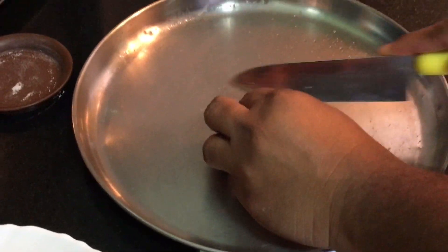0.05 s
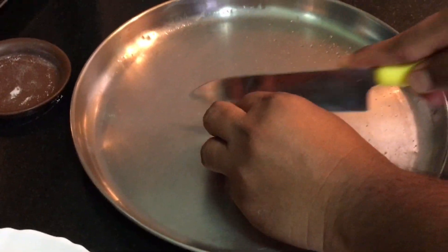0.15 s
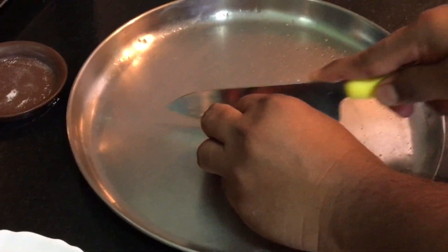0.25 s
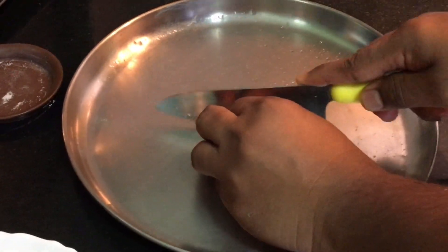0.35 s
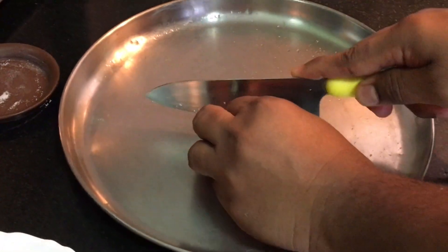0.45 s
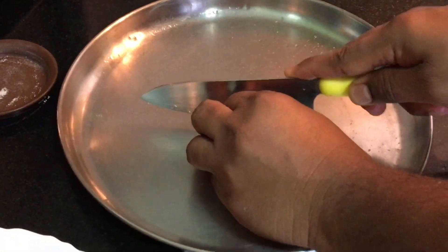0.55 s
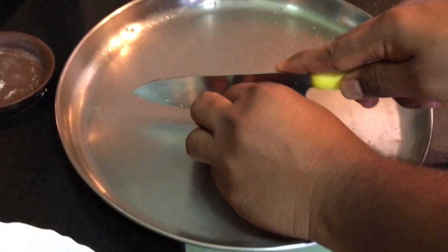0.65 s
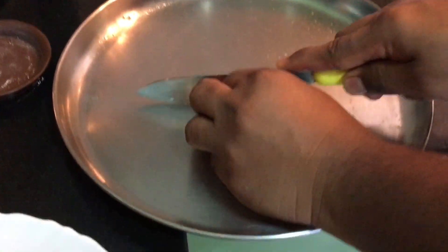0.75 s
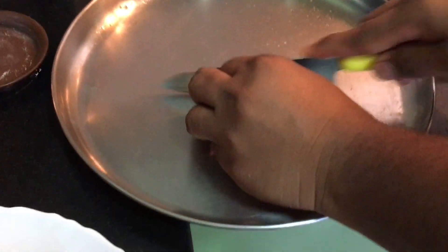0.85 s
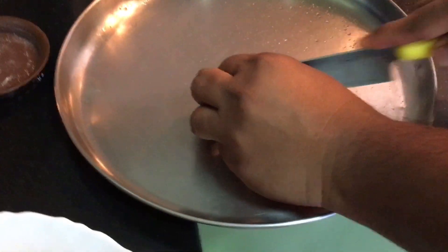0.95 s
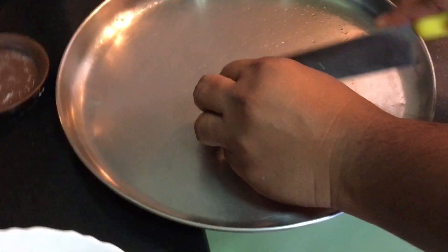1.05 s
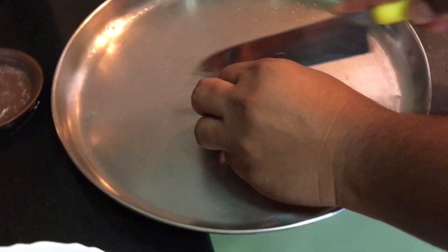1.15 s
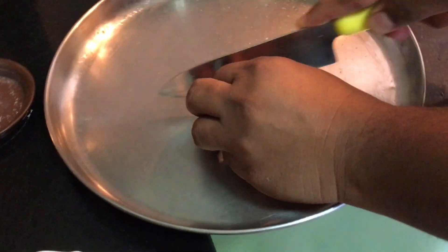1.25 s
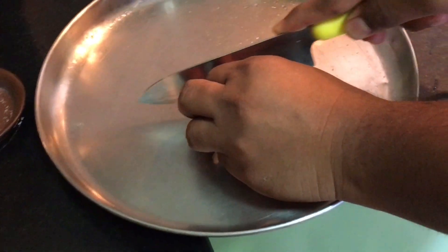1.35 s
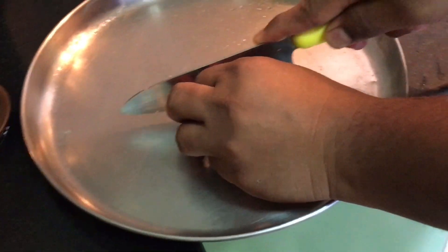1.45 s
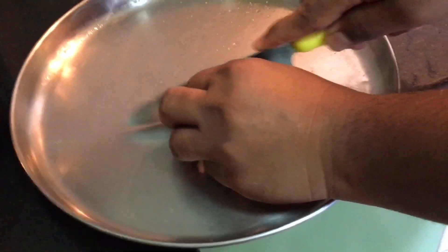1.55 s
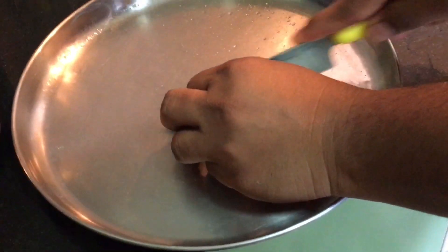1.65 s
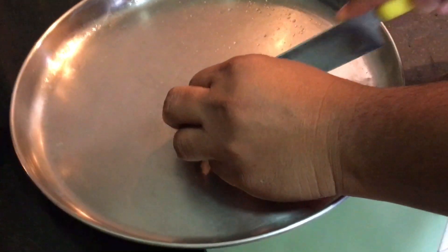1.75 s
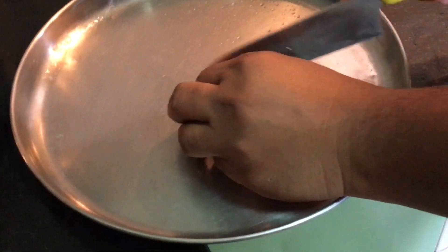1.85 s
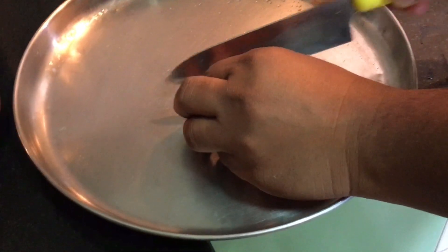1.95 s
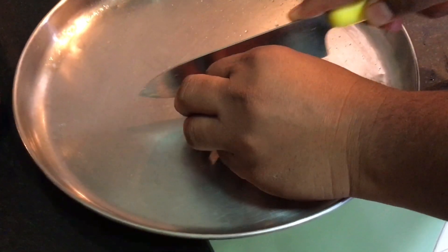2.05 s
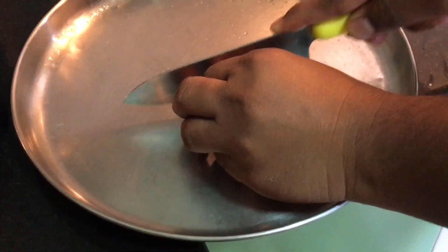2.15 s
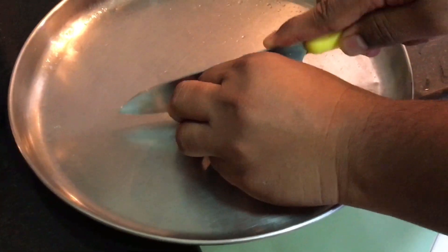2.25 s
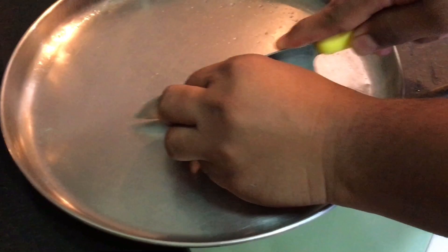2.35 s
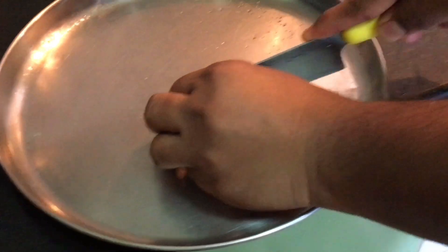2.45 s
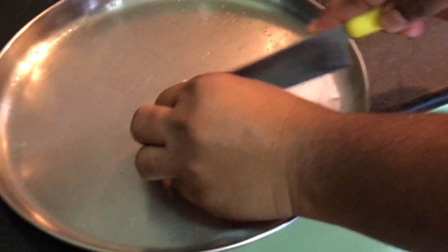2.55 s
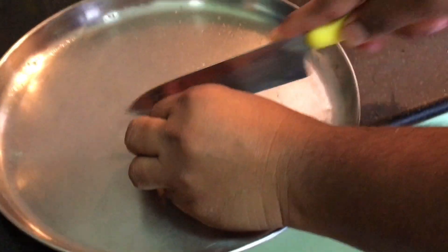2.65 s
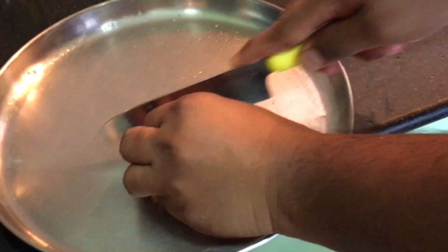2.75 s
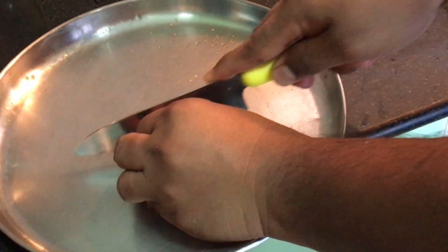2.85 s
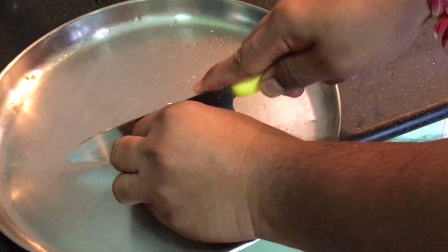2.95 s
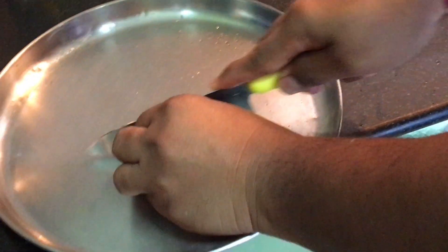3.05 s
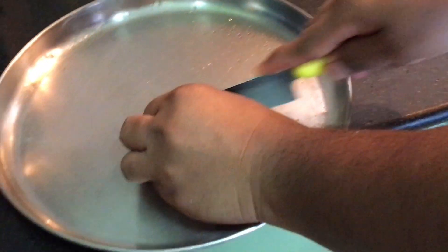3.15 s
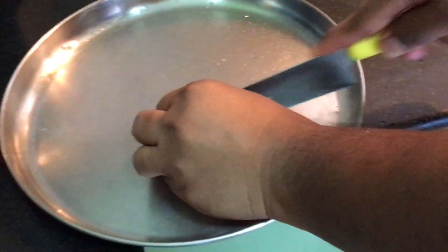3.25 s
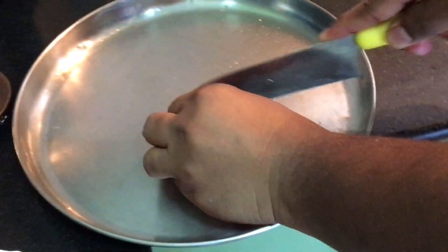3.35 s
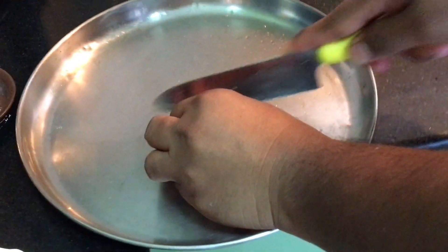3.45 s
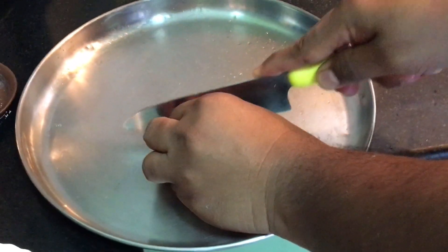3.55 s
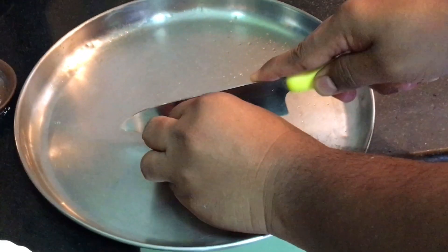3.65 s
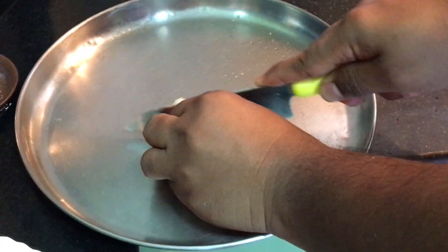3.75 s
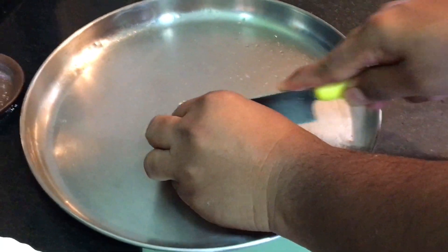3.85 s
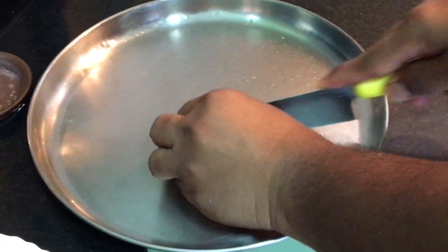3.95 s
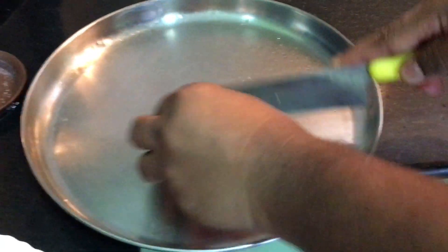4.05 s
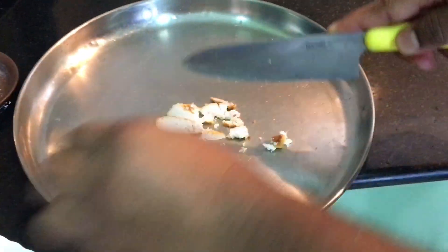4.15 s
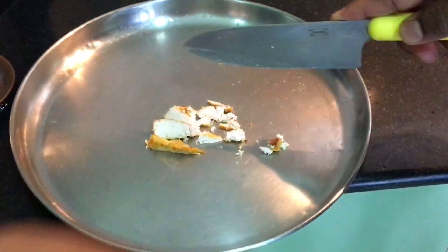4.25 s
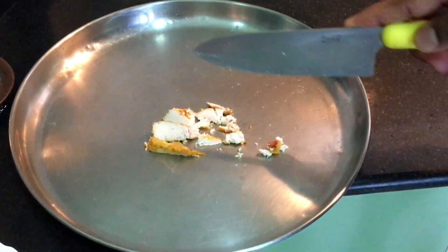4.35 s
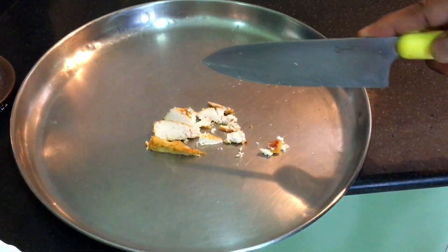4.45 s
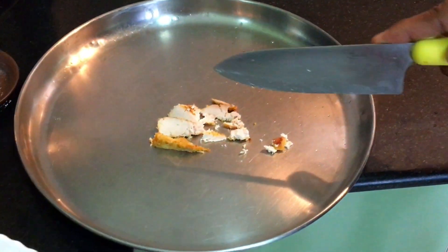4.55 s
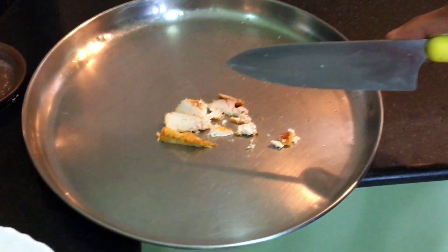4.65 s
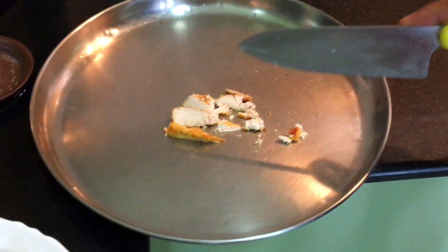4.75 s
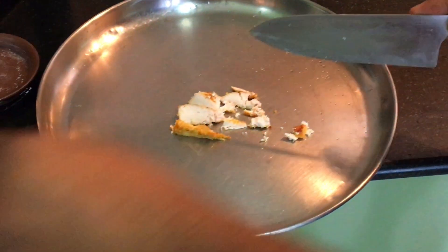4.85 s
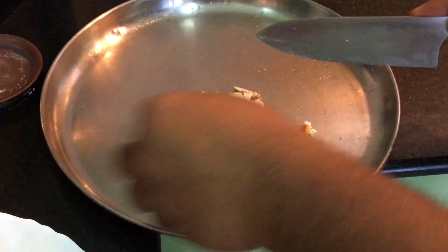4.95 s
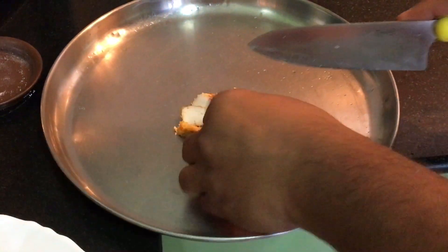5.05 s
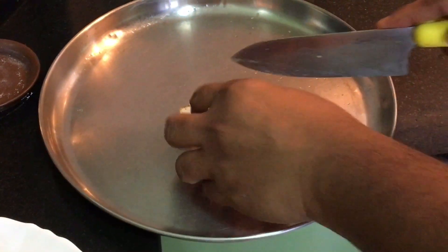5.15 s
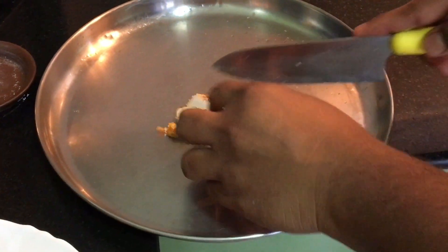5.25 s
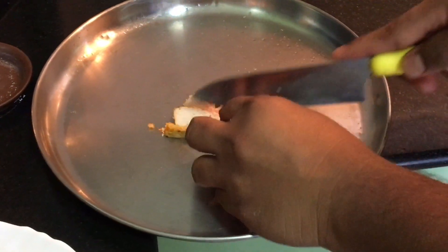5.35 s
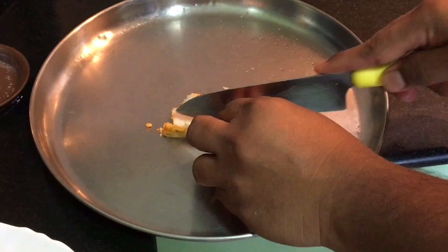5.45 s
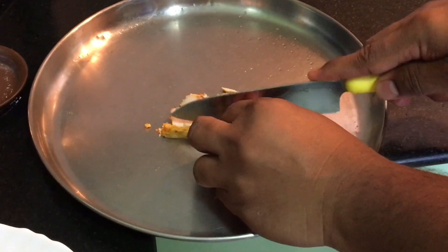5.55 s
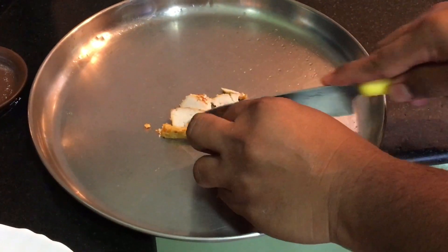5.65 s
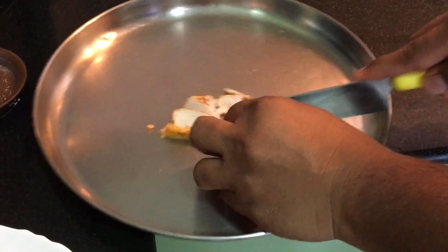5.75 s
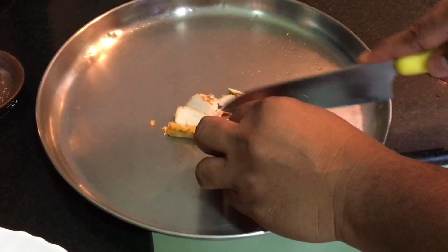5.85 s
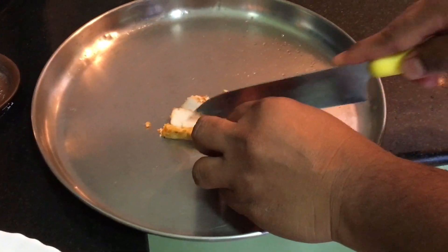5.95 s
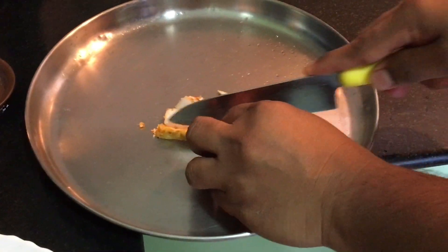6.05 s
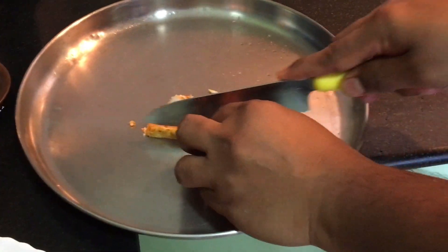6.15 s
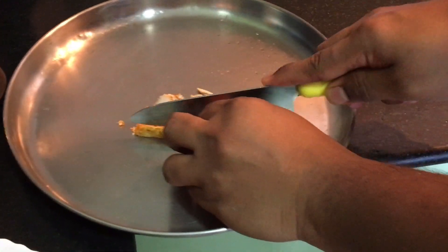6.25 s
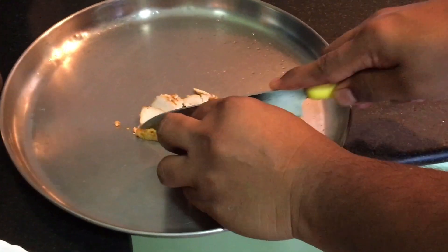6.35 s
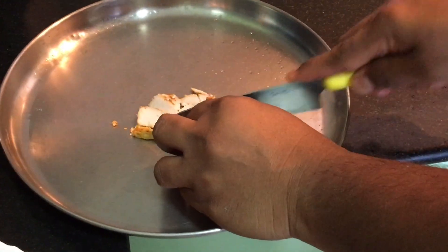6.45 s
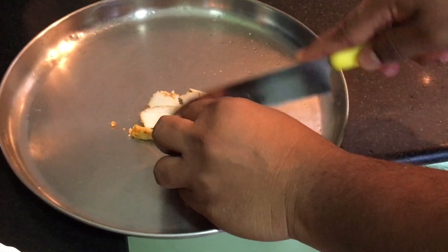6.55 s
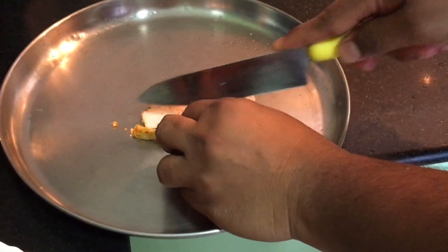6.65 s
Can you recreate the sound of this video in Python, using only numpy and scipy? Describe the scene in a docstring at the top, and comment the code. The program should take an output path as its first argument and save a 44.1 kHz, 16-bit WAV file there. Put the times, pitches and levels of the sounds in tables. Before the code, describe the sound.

A kitchen knife chops cooked chicken on a round steel plate, close to the microphone. About nine sharp knocks come unevenly, each with a short, half-damped metallic ring and a brief room echo. Between them the edge drags over the steel with a gritty hiss, blade and fingers tap lightly, and low thuds pass through the counter. Faint hum and hiss fill the quiet kitchen.

```python
"""A quiet tiled kitchen: a knife chops cooked chicken on a round steel plate, close to a phone.
Each chop knocks the plate, half damped by the hand, and the room answers; the edge then drags
back over the steel with a gritty hiss. Blade, fingers and crumbs tap lightly in between.
The pressed plate mutters, bumps cross the counter as low thuds, and the air hums and hisses."""
import sys
import numpy as np
from scipy import signal
from scipy.fft import rfft, irfft, next_fast_len
from scipy.io import wavfile
from scipy.ndimage import uniform_filter1d, map_coordinates

SR = 44100
rng = np.random.default_rng(int(sys.argv[2]) if len(sys.argv) > 2 else 0)


def unload_audio(sound):
    """Save the sound as a 16-bit wav file, at the path given as the first command line argument."""
    columns = np.transpose(np.atleast_2d(sound))
    # keep every value between -1 and 1, then stretch to whole-number steps
    steps = np.round(np.clip(columns, -1, 1) * 32767)
    wavfile.write(sys.argv[1], SR, steps.astype(np.int16))


N = 296352

# air noise: f/Hz, density/dB
AIR_SPECTRUM = [(25, -11.5), (55, 4.5), (90, -6.5), (137, -7), (180, -18), (320, -14), (520, -15.5),
                (1180, -20), (2500, -24), (5000, -28), (10000, -31), (17000, -28)]
# background drift: t/s, hiss change/dB, whistle level/dB
AIR_DRIFT = [(0, 2, -92), (1.1, 1, -76), (1.45, -0.5, -71), (2.2, 3, -89), (2.8, -2, -81), (3.05, 2.5, -80),
             (3.55, -2, -79), (3.9, 6, -78), (4.5, -2, -70), (5, 3, -69), (5.35, -2.5, -72.5),
             (5.9, 4, -66), (6.72, 2, -93)]
# room decay: f/Hz, t60/s
ROOM_DECAY = [(150, 0.9), (700, 0.41), (3000, 0.41), (12000, 0.22)]
# plate modes: f/Hz, level/dB, t60/s at damping 1
PLATE_MODES = [(153.4, -8.5, 0.23), (229.7, -0.5, 0.27), (312.6, -2.5, 0.17), (454.4, -11.5, 0.12),
               (571, -16.5, 0.39), (654, -13.5, 0.37), (685, -16, 0.26), (795, -22, 0.38), (1074, -40, 1),
               (1174, -8.5, 0.22), (1368, -20, 0.73), (1466, -36, 0.38), (1640, -20, 0.46),
               (1925, -14.5, 0.27), (2286, -16.5, 0.38), (2355, -11, 0.057), (2480, -10.5, 0.31),
               (2615, -16, 0.33), (2620, -16, 0.1), (3020, -12.5, 0.25), (3256, -20, 0.33),
               (3410, -11.5, 0.24), (3810, -7.5, 0.11), (4080, -23.5, 0.26), (4950, -26, 0.23),
               (5800, -13.5, 0.13), (6900, -27.5, 0.077), (8550, -23, 0.17)]
# hand and blade press the plate: t/s of most force, level/dB, rise/s per 20 dB
PLATE_PRESSES = [(.92, -43, 0.085), (1.74, -53, 0.14), (2.47, -34, 0.045), (2.87, -54.5, 0.035),
                 (3.24, -71, .1), (3.95, -53, .1), (5.08, -65, 0.02), (5.63, -34.5, 0.046),
                 (5.758, -26, 0.014), (6.28, -41.5, .03), (6.38, -51, .06), (6.72, -42, 0.052)]
# bumps through the counter: t/s, level/dB, f/Hz
COUNTER_THUDS = [(0.285, -45, 74), (0.744, -47, 63.5), (1.092, -42.5, 79), (1.155, -54, 88),
                 (1.28, -48.5, 133), (1.72, -41, 103.3), (1.768, -37, 40.4), (2.032, -31.5, 59.5),
                 (2.058, -22, 60.3), (2.149, -38, 70.6), (2.306, -50, 67), (2.451, -25.5, 74),
                 (2.475, -20, 56.6), (2.53, -32, 88.4), (2.884, -36, 77.4), (2.951, -38.5, 66.5),
                 (3.789, -36, 134), (4.04, -48, 79), (4.852, -31.5, 67), (5.055, -40, 72.7),
                 (5.59, -35.5, 139), (5.739, -38, 90), (6.277, -28.5, 56.5), (6.293, -33.5, 89.4),
                 (6.68, -25, 58.6)]
# sliding friction: f/Hz, density/dB
SLIDE_SPECTRUM = [(400, -11), (800, -13), (1500, -7.5), (3000, -8.5), (5500, -7), (9000, -12.5),
                  (13000, -13.5), (17000, -4.5)]
# blade resonances: f/Hz, width/Hz (140 at least is used), level/dB
BLADE_MODES = [(2190, 270, 2.5), (3120, 50, -28), (4060, 120, -5.5), (6150, 105, -2), (6940, 150, -24),
               (8950, 560, -7)]
# edge or finger slides: start/s, stop/s, level/dB, change/dB, blade song/dB, song centre/Hz
SLIDE_STROKES = [(0.813, 1.03, -42, 0.5, -22.5, 3850), (1.614, 1.778, -43, 4.5, -18.5, 5860),
                 (1.78, 2.243, -65, -14.5, -0.5, 2300), (2.36, 2.523, -41, 4, -19, 5450),
                 (2.85, 2.917, -55, -3, -18, 4030), (3.1, 3.29, -41.5, 5, -20.5, 4000),
                 (3.875, 4.024, -45.5, 5, -14, 4000), (4.051, 4.388, -58, -6.5, -2, 3530),
                 (4.588, 4.77, -54.5, 5, -33, 3160), (4.771, 4.877, -41.5, 4, -23, 2980),
                 (4.896, 5.098, -60, -25, -21, 6860), (5.439, 5.496, -45.5, 4, -7, 2620),
                 (5.51, 5.596, -51.5, 28, -25, 2600), (5.842, 6.26, -57.5, 6, -5, 4200),
                 (6.245, 6.33, -51.5, -4.5, -12.5, 2500), (6.41, 6.537, -45.5, 13.5, -15.5, 5500),
                 (6.573, 6.725, -55.5, 26, -20, 2300)]
# tap decay: centre f/Hz, t60/s
TAP_DECAY = [(350, 0.03), (3000, 0.073), (8000, 0.064)]
# light touches: t/s, level/dB, centre f/Hz, width/octaves, ring/dB
LIGHT_TAPS = [(1.194, -38.5, 3720, 1.1, -15), (1.248, -41.5, 2150, 0.73, -22),
              (1.283, -42, 4370, 0.33, -25), (1.516, -38, 2720, .9, -22), (1.75, -30.5, 3100, 0.31, -36),
              (2.025, -34, 2400, 3.3, -7), (2.45, -12.5, 685, 1.77, -11), (3.226, -27, 8000, 1.9, -29),
              (3.286, -25, 5860, 2.6, -22.5), (3.992, -23, 2320, 1.3, -15), (4.598, -40, 5000, 1.9, -31),
              (4.808, -22, 2200, 4, -12), (5.064, -27, 564, 0.86, -6.5), (5.111, -39, 3880, 0.23, -26),
              (5.343, -30, 346, 1, -11.5), (5.385, -33.5, 1770, 1.4, -31), (5.571, -42, 3850, .8, 3.5),
              (6.088, -29.5, 8000, 0.93, -24), (6.253, -35.5, 2500, 0.92, 7), (6.521, -24, 2180, 1.1, -31),
              (6.663, -31.5, 890, 2.5, -4.5)]
# crash of a chop: f/Hz, density/dB
CRASH_SPECTRUM = [(88, -11), (200, -10.5), (700, -5.5), (1500, -1.5), (3000, -6.5), (5500, -3.5),
                  (9000, -8.5), (13000, -9.5), (17000, -7)]
# crash decay: f/Hz, t60/s at damping 1
CRASH_DECAY = [(200, 0.11), (1000, 0.082), (3000, 0.065), (8000, 0.054), (16000, 0.013)]
# blows: t/s, level/dB, ring/dB, bass ring/dB, tilt/(dB/octave), f/Hz the spot favours, its lift/dB
KNIFE_CHOPS = [(.743, -3.5, -21.5, 2, -1, 1450, 26), (1.571, -9, -20.5, 1, -1.5, 1440, 17),
               (2.302, -6.5, -23.5, 2.5, -0.8, 2410, 6), (3.055, -9.5, -22, 5, -0.9, 2680, 11.5),
               (3.7805, 0.5, -27.5, 9, -1.2, 1170, 1), (4.8435, -18.5, -23, -2, -1.5, 2330, 10),
               (5.594, 0, -21, -8, -1.5, 1195, 6), (5.742, -2, -22.5, 0, 2.5, 2433, 8.5),
               (6.329, -6, -24.5, -6, -1.5, 1930, 14)]
# treble ripple, then a steep cutoff near 15.8 kHz: f/Hz, gain/dB
TREBLE_RESPONSE = [(3500, -1), (4200, -1), (5000, -3), (6600, 1), (7800, -1.5), (9400, 4.5), (10400, -1.5),
                   (11700, 4.5), (12300, 4), (13500, 2), (14800, -2.5), (15800, -5), (15900, -36.5)]


def amp(db):
    return 10 ** (np.asarray(db) / 20)


def unit(x):
    return x / np.sqrt(np.mean(x ** 2) + 1e-20)


def along(points, hz):
    """Interpolate (f/Hz, value) points on a log axis."""
    f, v = np.transpose(points)
    return np.interp(np.log(hz + 1), np.log(f + 1), v)


def filtered(x, response):
    m = next_fast_len(len(x) + 8192)
    return irfft(rfft(x, m) * response(np.fft.rfftfreq(m, 1 / SR)), m)[:len(x)]


def resonance(centre_hz, width_hz):
    return lambda f: 1j * f * width_hz / (centre_hz ** 2 - f * f + 1j * f * width_hz)


def noise(response, length=N):
    return unit(filtered(rng.standard_normal(length), response))


def wobble(rate_hz):
    """Smooth random curve."""
    knots = rng.standard_normal(int(N * rate_hz / SR) + 4)
    return map_coordinates(knots, [np.arange(N) * rate_hz / SR])


def patchy(depth_db, bins, frames):
    """Noise whose level varies in random patches, bins high and frames long."""
    z = signal.stft(rng.standard_normal(N), nperseg=512)[2]
    field = uniform_filter1d(uniform_filter1d(rng.standard_normal(z.shape), bins, 0), frames, 1)
    return signal.istft(z * amp(depth_db * unit(field)), nperseg=512)[1][:N]


def burst(length, gain, t60_s, hold_s=0):
    """Coloured noise; each frequency decays at its own rate."""
    hz, t, z = signal.stft(rng.standard_normal(length), SR, nperseg=128)
    colour = gain(hz) / np.sqrt(np.mean(gain(hz) ** 2))
    decay = amp(-60 * np.maximum(t - hold_s, 0) / t60_s(hz)[:, None])
    return signal.istft(z * colour[:, None] * decay, SR, nperseg=128)[1][:length]


def add(track, at_s, sound):
    part = track[round(at_s * SR):][:len(sound)]
    part += sound[:len(part)]


def kitchen_air(level_db=-54.5):
    """Air and microphone hiss drift, the bass sways, a faint whistle comes and goes."""
    at_s, hiss_db, whistle_db = np.transpose(AIR_DRIFT)
    t = np.arange(N) / SR
    air = unit(filtered(patchy(0.97, bins=3, frames=12), lambda f: amp(along(AIR_SPECTRUM, f))))
    bass = filtered(air, lambda f: 1 / (1 + (f / 160) ** 4))
    whistle = noise(resonance(6900, 130))
    hiss = amp(np.interp(t, at_s, hiss_db)) * (air - bass)
    hum = amp(2 * wobble(5.2) + 4.5) * bass
    whistle *= amp(np.interp(t, at_s, whistle_db) + 4.4 * wobble(7.03))
    return amp(level_db) * (hiss + hum) + whistle


def plate_murmur(rest_db=-65.5, hold_s=0.015, fall_db_per_s=159):
    """Pressed and rubbed by hand and food, the plate mutters in its low modes."""
    t = np.arange(N) / SR
    force = amp(rest_db)
    for at_s, db, rise_s in PLATE_PRESSES:
        fall_db = fall_db_per_s * np.maximum(t - at_s - hold_s, 0)
        force = force + amp(db - np.where(t < at_s, 20 * (at_s - t) / rise_s, fall_db))
    low_modes = lambda f: sum(amp(db) * np.abs(resonance(hz, 30)(f)) ** 2
                              for hz, db, _ in PLATE_MODES if hz < 1000)
    mutter = noise(lambda f: 0.09 * (f < 1200) + low_modes(f))
    return force * amp(4 * np.tanh(wobble(25))) * mutter


def counter_thuds(rise_s=0.011, t60_s=0.19):
    """Bumps cross the counter as a few low cycles; the plate shudders dully."""
    out, t = np.zeros(N), np.arange(SR // 2) / SR
    envelope = (1 - np.exp(-(t / rise_s) ** 2)) * amp(-60 * t / t60_s)
    envelope /= envelope.max()
    for at_s, db, hz in COUNTER_THUDS:
        shudder = amp(-24) * noise(lambda f: resonance(170, 190)(f) ** 2, len(t))
        add(out, at_s, amp(db + 4.5) * envelope * (np.sin(2 * np.pi * hz * t) + shudder))
    return out


def plate_response(f, lift_db=10, relative_width=0.032):
    """The plate's upper modes lift noise at their pitches."""
    return 1 + sum(amp(db + lift_db) * resonance(hz, relative_width * hz)(f)
                   for hz, db, _ in PLATE_MODES if hz > 500)


def plate_ring(t, bass_db, damping, favoured_hz, lift_db):
    """Struck modes ring and waver in level and pitch, as close pairs beat; low ones waver less."""
    out = np.zeros(len(t))
    for hz, db, t60_s in PLATE_MODES:
        spot_db = lift_db * np.exp(-(np.log(hz / favoured_hz) / 0.028) ** 2)
        strength_db = db + rng.normal(0, 2.5) + bass_db * (hz < 750) + spot_db
        swell = 1 - np.exp(-t * hz / 4)
        waver_hz, depth = np.clip(hz / 22, 15, 110), np.clip(hz / 570, 0.3, 1)
        level_waver, phase_waver = (depth * np.interp(t * waver_hz, np.arange(80), knots)
                                    for knots in rng.standard_normal((2, 80)))
        envelope = swell * amp(strength_db + 3.7 * level_waver - 60 * t * damping / t60_s)
        out += envelope * np.sin(2 * np.pi * (hz * t + rng.random()) + 1.57 * phase_waver)
    return out


def slides(plate_share=0.32, arch_db=2, onset_s=0.002, release_t60_s=0.11):
    """Grit under the edge hisses, squeaks briefly and wakes the blade's resonances."""
    grit = patchy(3.6, bins=2, frames=5) * amp(1.4 * wobble(400))
    colour = lambda f: amp(along(SLIDE_SPECTRUM, f)) * (1 + plate_share * (plate_response(f) - 1))
    hiss = unit(filtered(grit, colour))
    treble = filtered(hiss, lambda f: 1 / (1 + (4500 / (f + 1)) ** 4))
    tones = [(hz, amp(db + 2.7 * wobble(30)) * noise(resonance(hz, max(width_hz, 140))))
             for hz, width_hz, db in BLADE_MODES]
    out = np.zeros(N)
    for start_s, stop_s, db, change_db, song_db, centre_hz in SLIDE_STROKES:
        n = np.arange(round(start_s * SR), min(round((stop_s + 0.1) * SR), N))
        t = n / SR
        level_db = np.interp(t, [start_s, (start_s + stop_s) / 2, stop_s],
                             [db - change_db / 2, db + arch_db, db + change_db / 2])
        onset = 1 - np.exp(-(t - start_s) / onset_s)
        release = amp(-60 * np.maximum(t - stop_s, 0) / release_t60_s)
        song = sum(amp(-9 * np.log2(hz / centre_hz) ** 2) * tone[n] for hz, tone in tones)
        treble_db = 0.6 * (song_db + 12)  # more song, brighter hiss
        scrape = hiss[n] + (amp(treble_db) - 1) * treble[n]
        out[n] += amp(level_db) * onset * release * (scrape + amp(song_db) * song)
    return amp(0.49 * wobble(35)) * out


def room_tail(length, colour):
    """The tiled room answers a hit with decaying noise."""
    return burst(length, colour, lambda f: along(ROOM_DECAY, f))


def taps(rise_s=0.0006):
    """Blade, fingers and crumbs touch the plate: a noise puff, some ring and room."""
    out, t = np.zeros(N), np.arange(SR // 3) / SR
    rise = 1 - np.exp(-t / rise_s)
    for at_s, db, centre_hz, octaves, ring_db in LIGHT_TAPS:
        colour = lambda f: 0.073 + amp(-6 * (np.log2((f + 50) / centre_hz) / octaves) ** 2)
        puff = burst(len(t), colour, lambda f: np.full_like(f, along(TAP_DECAY, centre_hz)))
        touch = amp(-3) * filtered(puff + amp(-6) * room_tail(len(t), colour), plate_response)
        ring = plate_ring(t, bass_db=10.7, damping=1.32, favoured_hz=centre_hz, lift_db=0)
        add(out, at_s, amp(db - 14.5) * rise * (touch + amp(ring_db) * ring))
    return out


def chops(rise_s=0.0007, crack_s=0.0035, contact_s=0.0034, room_rise_s=0.0041, hand_damping=0.91):
    """A blow cracks, spreads over the plate as a crash, leaves it ringing and fills the room."""
    out, t = np.zeros(N), np.arange(SR * 2 // 3) / SR
    rise = 1 - np.exp(-t / rise_s)
    crack = 1 + amp(0.5) * np.exp(-t / crack_s)
    t60_s = lambda f: along(CRASH_DECAY, f) / hand_damping
    for at_s, db, ring_db, bass_db, db_per_octave, favoured_hz, lift_db in KNIFE_CHOPS:
        colour = lambda f: amp(along(CRASH_SPECTRUM, f) + db_per_octave * np.log2((f + 100) / 2000))
        edge_rattle = amp(2.72 * map_coordinates(rng.standard_normal(700), [t * 900]))
        crash = crack * edge_rattle * burst(len(t), colour, t60_s, hold_s=contact_s)
        room = room_tail(len(t), colour) * (1 - np.exp(-t / room_rise_s))
        knock = filtered(amp(-14.5) * crash + amp(-23.5) * room, plate_response)
        ring = plate_ring(t, bass_db, hand_damping, favoured_hz, lift_db)
        add(out, at_s, amp(db) * rise * (knock + amp(ring_db) * ring))
    return out


def scene():
    return (chops() + taps() + counter_thuds() + slides() + plate_murmur() + kitchen_air())[None]


def record(dry, low_hz=38, top_hz=16800, ceiling=0.9):
    """The microphone drops deep bass and rounds tall peaks. The treble ripples, then cuts off."""
    heard = filtered(dry[0], lambda f: (1j * f / (low_hz + 1j * f)) ** 4)
    rounded = heard / (1 + np.abs(heard / ceiling) ** 4) ** (1 / 4)
    return filtered(rounded, lambda f: amp(along(TREBLE_RESPONSE, f)) * (f < top_hz))[None]


dry = scene()
out = record(dry)
unload_audio(out)
```